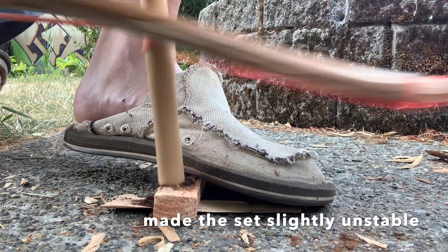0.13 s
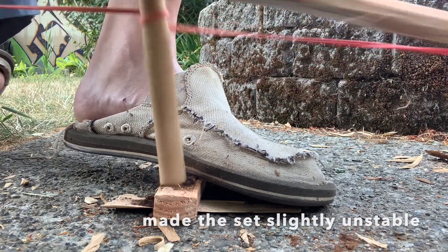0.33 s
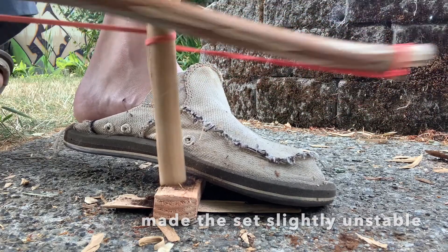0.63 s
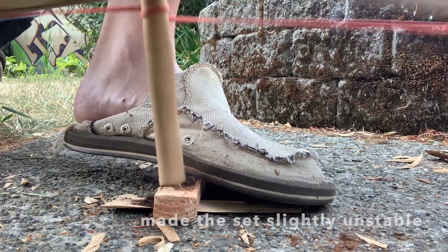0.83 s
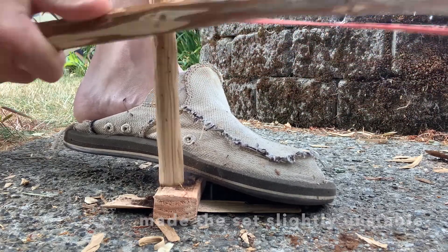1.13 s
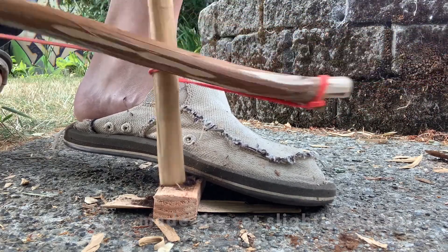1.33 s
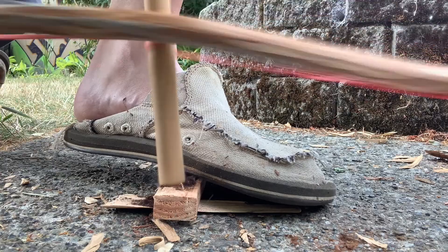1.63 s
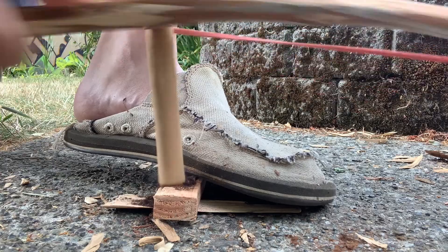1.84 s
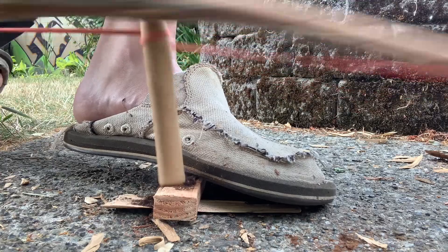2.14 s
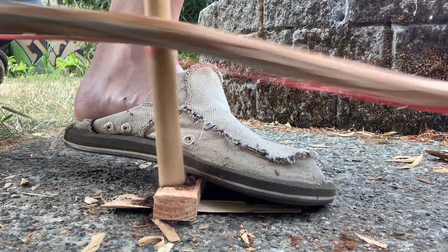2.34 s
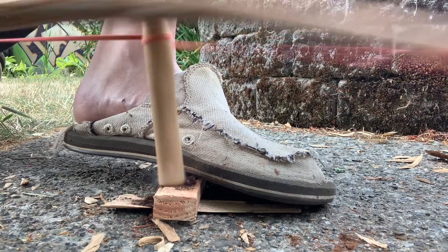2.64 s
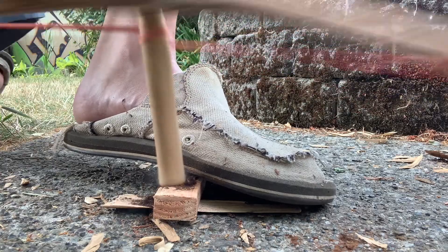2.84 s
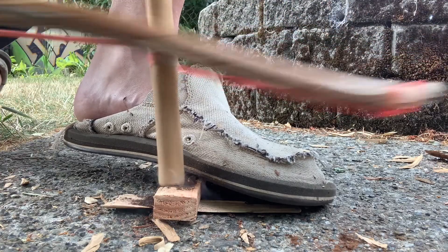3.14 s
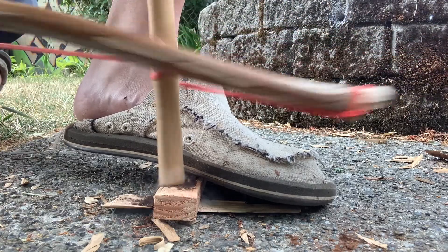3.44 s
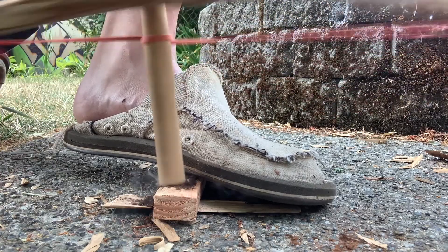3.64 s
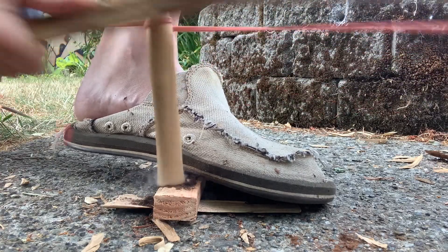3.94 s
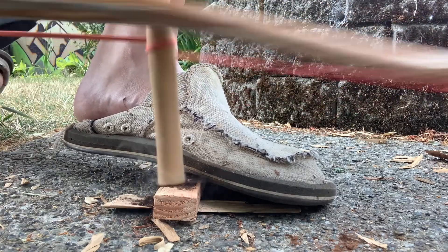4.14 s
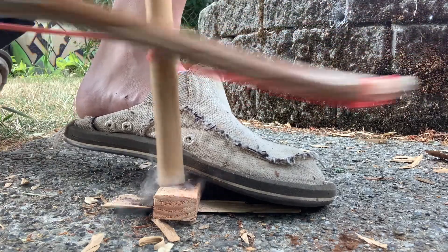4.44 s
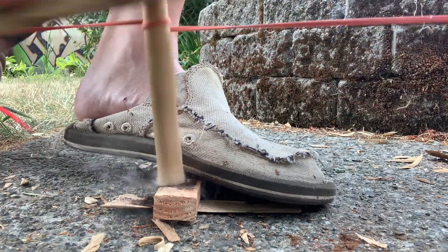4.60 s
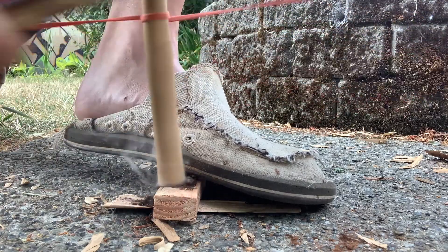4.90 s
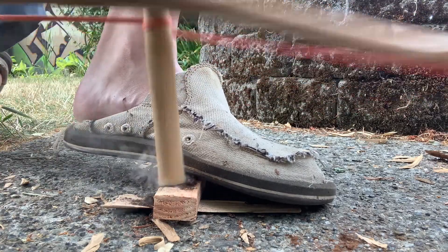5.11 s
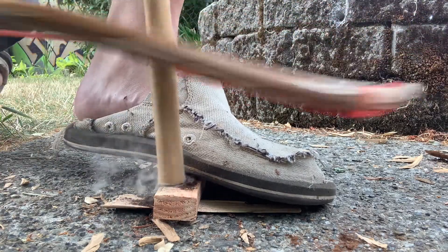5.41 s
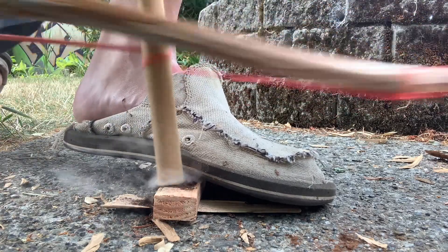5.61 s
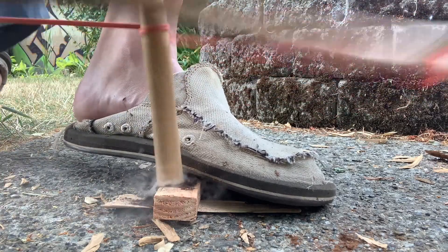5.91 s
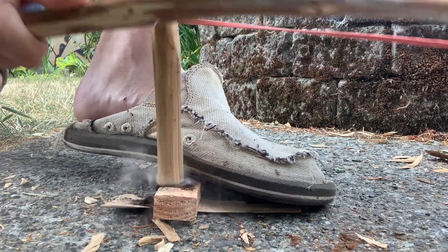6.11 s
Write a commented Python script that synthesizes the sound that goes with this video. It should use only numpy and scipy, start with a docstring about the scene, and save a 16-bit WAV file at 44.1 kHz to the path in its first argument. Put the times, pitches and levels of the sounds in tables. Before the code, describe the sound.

Close up and outdoors, a bow drill grinds wood against wood in a quick, steady rhythm. Dry rasping strokes alternate between slightly higher and lower squeaks, with irregular clicks from the spindle and cord and a soft rumble from the board on the ground. The squeaks weaken toward the end while the scraping carries on. A faint low hum dies away early, leaving a quiet wash of far traffic and leaves behind.

```python
"""Bow drill outdoors

A cord spins a wooden spindle to and fro in a board, close to a pair of microphones. Sliding friction
hisses with the spin; stick-slip friction in the socket excites the modes of spindle and board, which
chatter and ring up where the tip catches. Each stroke shakes the board on the ground. The spindle stops
at every turn; wood and cord tick as they slip. Behind lie a far murmur and a faint hum."""
import sys
import numpy as np
from scipy import signal
from scipy.fft import rfft, irfft, next_fast_len
from scipy.io import wavfile
from scipy.ndimage import uniform_filter1d

SR = 44100
rng = np.random.default_rng(int(sys.argv[2]) if len(sys.argv) > 2 else 0)


def bounce(signal):
    """Save signal as a 16-bit WAV file at the path given by the first command-line argument."""
    frames = np.transpose(np.atleast_2d(signal))
    limited = np.clip(frames, -1, 1)
    pcm = np.round(limited * 32767).astype(np.int16)
    wavfile.write(sys.argv[1], SR, pcm)


N = 276066
TIME = np.arange(N) / SR


def amp(db):
    """Amplitude ratio of a level in decibels."""
    return 10 ** (np.asarray(db) / 20)


def unit_rms(x):
    """Normalisation to rms 1."""
    return x / np.sqrt(np.mean(x ** 2) + 1e-20)


def shaped_noise(spectrum, coherence=1.0):
    """Spectral shaping: two channels of white noise of given coherence, filtered to (f/Hz, level/dB)."""
    own, right = rng.standard_normal(size=(2, N))
    left = coherence * own + np.sqrt(1 - coherence ** 2) * right
    hz, db = np.transpose(spectrum)
    size = next_fast_len(N)
    gain = amp(np.interp(np.log(np.fft.rfftfreq(size, 1 / SR) + 1), np.log(hz), db))
    return unit_rms(irfft(rfft([left, own], size) * gain, size)[:, :N])


def flutter(ms, depth_db):
    """Random modulation: a log-normal factor that wanders on a time scale of ms."""
    size = round(ms * SR / 1000)
    return amp(depth_db * unit_rms(uniform_filter1d(uniform_filter1d(rng.standard_normal(N), size), size)))


def mode(force, hz, width_hz, db, left_lead, left_db):
    """Forced resonance: a double pole, fixed or gliding, with its own phase and level at each side."""
    radius = np.exp(-np.pi * width_hz / np.sqrt(np.sqrt(2) - 1) / SR)
    if np.ndim(hz):
        carrier = np.exp(2j * np.pi * np.cumsum(hz) / SR)
        response = carrier * signal.lfilter([1], [1, -2 * radius, radius ** 2], force / carrier)
    else:
        pole = radius * np.exp(2j * np.pi * hz / SR)
        response = signal.lfilter([1], [1, -2 * pole, pole ** 2], force)
    response *= np.sqrt((1 - radius ** 2) ** 3 / (1 + radius ** 2))  # unit power gain
    sides = [[np.exp(1j * left_lead) * amp(left_db / 2)], [amp(-left_db / 2)]]
    return amp(db) * (response * sides).imag


def add(mix, s, sound):
    """Superposition of a sound on the mix at time s."""
    part = mix[..., max(round(s * SR), 0):][..., :sound.shape[-1]]
    part += sound[..., :part.shape[-1]]


# Spectrum of the outdoor background: f/Hz, level/dB
AIR_SPECTRUM = [(25, -26), (45, -39), (80, 1), (170, 7), (300, -16.5), (700, -12), (2000, -26),
                (16000, -32)]
def air():
    """Ambient noise: far traffic and leaves reach the two microphones partly coherent."""
    return amp(-44) * flutter(150, 1.3) * shaped_noise(AIR_SPECTRUM, coherence=0.6)


def hum():
    """Narrow-band noise: a faint, fuzzy low hum that slowly fades."""
    fade = amp(-1.5 * TIME)
    return fade * mode(rng.standard_normal(N), hz=168.8, width_hz=10, db=-39.5, left_lead=0, left_db=-3.6)


# The tip's bite in each stroke, push and pull in turn: start t/s, end t/s, level/dB
STROKES = [(-0.05, 0.049, -37), (0.111, 0.223, -25), (0.299, 0.414, -27.5), (0.512, 0.644, -28.5),
           (0.7, 0.788, -22), (0.857, 0.986, -25.5), (1.033, 1.13, -22), (1.209, 1.337, -24),
           (1.401, 1.532, -26), (1.601, 1.719, -23.5), (1.798, 1.879, -22.5), (1.961, 2.081, -29.5),
           (2.133, 2.234, -25.5), (2.301, 2.435, -23.5), (2.453, 2.585, -27), (2.646, 2.761, -23),
           (2.827, 2.926, -22.5), (2.984, 3.096, -25.5), (3.168, 3.244, -23), (3.339, 3.432, -24.5),
           (3.504, 3.588, -21.5), (3.658, 3.758, -26.5), (3.83, 3.916, -22.5), (3.989, 4.096, -27),
           (4.161, 4.244, -22), (4.328, 4.419, -25.5), (4.483, 4.569, -25.5), (4.631, 4.745, -25.5),
           (4.814, 4.898, -23), (4.965, 5.069, -30.5), (5.132, 5.207, -23), (5.281, 5.384, -26.5),
           (5.441, 5.518, -26.5), (5.573, 5.694, -25.5), (5.732, 5.827, -23.5), (5.877, 5.981, -33.5),
           (6.051, 6.113, -24.5), (6.189, 6.287, -30)]
FIRST_TURN_S, LAST_TURN_S = -0.077, 6.33
def bow_turns():
    """Reversal of motion: the time of the turn before each stroke, and the pause in biting around it."""
    start, end, _ = np.transpose(STROKES)
    pause = np.maximum(start[1:] - end[:-1], 0)
    turn_share = np.resize((0.41, 0.49), len(start))[1:]  # of the pause before a push, a pull
    return np.append(FIRST_TURN_S, end[:-1] + turn_share * pause), np.append(0, pause)


def bow_motion():
    """Reciprocating motion: the stroke under way at each sample and its progress from 0 to 1."""
    turn = np.append(bow_turns()[0], LAST_TURN_S)
    place = np.interp(TIME, turn, np.arange(len(turn)))
    return place.astype(int), place % 1


def drift(rule):
    """Linear drift as the socket wears and chars, a value per stroke; rows: at t = 0, change per s."""
    first, per_s = np.array(rule)[:, np.arange(len(STROKES)) % 2]
    return first + per_s * np.transpose(STROKES)[0]


def bite(stroke, progress):
    """Friction envelope: the tip grips sharply, swells and lets go; a little grip lasts all stroke."""
    start, end, db = np.transpose(STROKES)[:, stroke]
    edge = np.clip(np.minimum((TIME - start) / 0.0094 + 0.98, (end - TIME) / 0.0039 + 0.62), 0, 1)
    swell = 0.49 + 0.51 * np.sin(np.pi * np.clip((TIME - start) / (end - start), 0, 1))
    return amp(db) * edge ** 2 * swell + amp(-45) * np.sin(np.pi * progress) ** 2


# Spectrum of sliding wood: f/Hz, level/dB
HISS_SPECTRUM = [(300, -29), (1000, -5.5), (3000, 0.5), (5500, -3.5), (7200, -0.5), (11000, -9.5),
                 (13200, 0), (15500, -5)]
# Drift of the hiss: push level/dB, pull level/dB
HISS_DRIFT = [(-32, -31.5), (-0.04, -0.77)]
def hiss(stroke, progress):
    """Sliding friction: polished wood on wood gives noise that follows the spin and sinks at each turn."""
    turn, pause = bow_turns()
    still_s = np.resize((0.8, 0.32), len(pause)) * pause  # before a push, a pull
    start = turn + still_s / 2
    end = np.append(turn[1:] - still_s[1:] / 2, LAST_TURN_S)
    since, until = TIME - start[stroke], end[stroke] - TIME
    edge = np.clip(np.minimum(since / 0.046 + 0.46, until / 0.051 + 0.074), 0, 1)
    spin = edge * (0.57 + 0.22 * np.sin(np.pi * progress))
    floor_db = np.interp(TIME, turn, -40.5 - 140 * pause)  # the longer the pause, the quieter
    level = np.hypot(amp(drift(HISS_DRIFT)[stroke]) * spin, amp(floor_db))
    return amp([[-3.3], [-4.4]]) * level * flutter(14, 7.8) * shaped_noise(HISS_SPECTRUM)


# Spectrum of the board on the ground: f/Hz, level/dB
RUMBLE_SPECTRUM = [(25, -65), (45, -53), (80, 0), (130, 1), (170, 4.5), (230, 0), (400, -3), (700, -23)]
# Drift of the rumble: push level/dB, pull level/dB
RUMBLE_DRIFT = [(-30.5, -30.5), (-0.1246, 0.1)]
def rumble(stroke, progress):
    """Forced vibration: the spindle shakes the board, most early in a push and late in a pull."""
    tilt_db = np.where(stroke % 2, 11, -6.5) * (progress - 0.7538)
    level = amp(drift(RUMBLE_DRIFT)[stroke] + tilt_db) * np.sin(np.pi * progress) ** 1.35
    level = uniform_filter1d(level, size=300)
    return amp([[0.1], [2.7]]) * level * flutter(9.3, 3.2) * shaped_noise(RUMBLE_SPECTRUM)


# Modes of spindle and board: f/Hz, bandwidth/Hz, level/dB, left phase lead/rad, left over right/dB
WOOD_MODES = [(280, 82, -10.5, -0.3, -5.6), (454, 109, -8.5, -0.94, -4.1), (832, 295, -6.5, -0.6, 2),
              (1619, 402, -3.5, -0.2, 0.5), (1980, 250, -1.5, -0.97, -7), (2720, 954, -2.5, 0.07, -4),
              (3980, 1400, -11, 0.16, -3.5), (6960, 1200, -12.5, 0.6, -1.5)]
# Drift of the ring, the spindle's first bending mode: push f/Hz, pull f/Hz
RING_PITCH_DRIFT = [(1095, 972.5), (-9.5, -11.5)]
# Drift of the ring's drive, weakening as the socket chars: push level/dB, pull level/dB
RING_LEVEL_DRIFT = [(1.6, 1.33), (-0.45, -0.53)]
# Drift of the drive to the modes above the ring: push level/dB, pull level/dB
RASP_DRIFT = [(-1.54, -2.3), (0.65, -0.074)]
RING_LEAD_RAD = 0.27  # phase lead at the left microphone
def chatter(stroke, progress):
    """Stick-slip excitation: clumps of small, uneven slips ring the modes of spindle and board."""
    slips_per_s = 1300
    size = np.minimum(rng.exponential(size=N), 3.4) * rng.choice([-1., 1.], size=N)
    slips = size * (rng.random(N) < slips_per_s / SR) * flutter(2.8, 5.4)
    # the turning spindle shows each microphone a different mix
    grip = (1 + 0.87 * rng.standard_normal(size=(2, N))) * bite(stroke, progress)
    ring_hz = uniform_filter1d(drift(RING_PITCH_DRIFT)[stroke], size=800) * flutter(7, 0.38)
    ring_hz *= 0.99 + 0.057 * np.sin(np.pi * progress)  # rises with the spin
    grind = grinding()
    # heavy low modes take in only part of a hard slip; light high modes take it whole
    low_drive = grip * unit_rms(np.sign(slips) * abs(slips) ** 0.56)
    high_drive = (grip * unit_rms(slips) + grind) * amp(drift(RASP_DRIFT)[stroke])
    share = flutter(8.6, 3.98)
    wood = np.zeros((2, N))
    for k, (hz, *settings) in enumerate(WOOD_MODES):
        drive = high_drive if hz > ring_hz.mean() else low_drive
        own_share = np.roll(share, k * N // len(WOOD_MODES))  # a slip feeds the modes unevenly
        wood += mode(drive * own_share, hz, *settings)
    ring_drive = (low_drive + 0.51 * grind) * amp(drift(RING_LEVEL_DRIFT)[stroke]) * flutter(7.6, 2.63)
    ring = mode(ring_drive, ring_hz, width_hz=204, db=1.9, left_lead=RING_LEAD_RAD, left_db=-0.2)
    return amp(-1.46) * (ring + wood)


def burst(t, rise_s, fall_s):
    """Transient envelope: exponential rise and decay, peak 1."""
    shape = (1 - np.exp(-t / rise_s)) * np.exp(-t / fall_s)
    return shape / shape.max()


# Hard slips of wood and cord: t/s, crack level/dB, snap level/dB
TICKS = [(0.0367, -25, -14.5), (0.1967, -17.5, -14), (0.2408, -36, -19.5), (0.3062, -17, -54),
         (0.461, -26, -17), (0.5672, -24, -14), (0.592, -15.5, -20), (0.9496, -12, -17.5),
         (1.0367, -10.5, -32), (1.1642, -28.5, -58), (1.2548, -21, -30), (1.4269, -13.5, -45),
         (1.5626, -27.5, -16), (1.655, -14.5, -25), (1.6811, -19, -28), (1.71, -16.5, -24),
         (1.748, -25.5, -10.5), (1.7933, -12, -29), (1.8259, -9.5, -29), (1.929, -32, -44),
         (2.1015, -28, -24), (2.1599, -15, -30), (2.4235, -16.5, -18), (2.656, -21, -13.5),
         (2.7192, -16.5, -9.5), (2.75, -20.5, -19), (2.7814, -18, -17), (2.8747, -11.5, -22),
         (2.9083, -11, -21), (2.9521, -34, -29), (3.1248, -28, -22.5), (3.1808, -16, -43),
         (3.2321, -16, -52), (3.4122, -19, -56), (3.458, -19.5, -30), (3.869, -10.5, -16),
         (3.8878, -13.5, -8.5), (4.0868, -13, -25), (4.1387, -23.5, -58), (4.2221, -11.5, -7),
         (4.4981, -15, -23), (4.5228, -14, -6.5), (4.543, -14, -8), (4.83, -21, -34), (4.8548, -14, -29),
         (4.8803, -18, -36), (4.923, -42, -33), (5.1128, -22.5, -48), (5.145, -12.5, -25),
         (5.1856, -11.5, -31), (5.3254, -19, -36), (5.3561, -12.5, -44), (5.4656, -9, -30),
         (5.4963, -14, -46), (5.668, -19, -40), (5.7085, -28.5, -16.5), (5.7719, -10, -6.5),
         (5.793, -15, -10.5), (5.812, -19, -26), (6.0113, -28.5, -17), (6.0532, -17, -32)]
def ticks():
    """Impulsive excitation: a hard slip gives a crack of a few cycles and a shorter, bright snap."""
    out, t = np.zeros((2, N)), np.arange(SR // 100) / SR
    treble = signal.butter(2, 6500, "high", fs=SR, output="sos")
    for s, crack_db, snap_db in TICKS:
        wood_noise, snap_noise, left_noise = rng.standard_normal(size=(3, len(t)))
        hz = 3140 + 41 * (snap_db - crack_db)  # the more snap over crack, the higher the crack
        band = signal.butter(2, [0.46 * hz, 1.46 * hz], "band", fs=SR, output="sos")
        wood = unit_rms(signal.sosfilt(band, [1.14 * wood_noise + 0.4 * left_noise, wood_noise]))
        crack = amp(crack_db) * wood * amp([[-2.2], [2.1]]) * burst(t, 0.00058, 0.0021)
        snap = amp(snap_db) * unit_rms(signal.sosfilt(treble, snap_noise)) * burst(t, 0.00042, 0.0012)
        add(out, s - 0.0007, crack + snap)
    return out


# Catches of the tip in the socket: centre t/s, peak level/dB, duration/ms
CATCHES = [(0.1645, -12, 3.7), (0.1807, -14, 8.1), (0.1988, -11, 3.8), (0.3686, -7.5, 7.7),
           (0.5795, -1.5, 6.2), (0.6072, -9, 3.8), (0.7232, -9, 3.2), (0.736, -11, 11), (0.76, -8.5, 1.2),
           (0.899, -12.5, 7.8), (0.9521, -10, 3.1), (1.0771, -6, 1.1), (1.0956, -8.5, 3.7),
           (1.2573, -7, 4.9), (1.268, -7, 4.9), (1.317, -11.5, 4.1), (1.4547, -10, 3.2),
           (1.4787, -14.5, 8.5), (1.5045, -9, 4.5), (1.657, -7.5, 5.1), (1.6825, -14, 3.4),
           (1.7117, -12, 4.4), (1.8268, -8, 3), (1.8512, -7, 8.9), (2.0003, -13.5, 4.8), (2.195, -6.5, 5.1),
           (2.3871, -18, 6.1), (2.5229, -4.5, 4.5), (2.5454, -3, 8.6), (2.708, -8.5, 4.4), (2.8937, -11, 2),
           (2.9098, -13, 6.9), (3.0274, -6.5, 5.3), (3.052, -13, 7.3), (3.1871, -12, 3.0),
           (3.2066, -15, 2.9), (3.2289, -3, 4.8), (3.396, -18, 2.8), (3.5424, -6, 5.6), (3.5632, -10, 9.3),
           (3.7086, -14, 6.1), (3.8671, -4.5, 2.2), (3.9075, -12.5, 5.2), (4.203, -13, 6.0),
           (4.2116, -8, 2.9), (4.2264, -11.5, 3), (4.3691, -13, 5.2), (4.5197, -5.5, 2.7),
           (4.9909, -12.5, 2.5), (5.1848, -15, 5.0), (5.487, -12.5, 2.6), (5.6435, -15.5, 4.2),
           (5.9391, -16, 5.3), (6.0996, -18, 5.6), (6.2282, -8.5, 1.9)]
# Drift of the ring's overtone: push f/Hz, pull f/Hz
OVERTONE_PITCH_DRIFT = [(2010, 1863), (-20, 70)]
# Drift of the overtone relative to the ring: push level/dB, pull level/dB
OVERTONE_LEVEL_DRIFT = [(-7.5, -8.5), (0.9, -0.1)]
def catches(stroke):
    """Friction-driven resonance: the tip grabs, ring and overtone swell, and the socket damps them."""
    out, t = np.zeros((2, N)), np.arange(-SR // 100, SR // 100) / SR
    left = np.array([[1], [0]])
    for s, db, ms in CATCHES:
        phase, lead, delay, over_detune, over_lead, detune, over_level = rng.standard_normal(7)
        k = stroke[round(s * SR)]
        hz = drift(RING_PITCH_DRIFT)[k] * (1.019 + 0.025 * detune)  # a little sharp on average
        ring_phase = 2 * np.pi * (hz * t + phase) + (RING_LEAD_RAD + 0.63 * lead) * left
        ring = np.exp(-(t * 1000 / ms) ** 2 / 0.32) * np.sin(ring_phase)
        over_hz = drift(OVERTONE_PITCH_DRIFT)[k] * (1 + 0.054 * over_detune)
        over_db = drift(OVERTONE_LEVEL_DRIFT)[k] + 2.5 * over_level
        over_t = t - 0.001177 * delay
        over_phase = 2 * np.pi * over_hz * over_t + 0.54 * over_lead * left
        overtone = amp(over_db) * np.exp(-(over_t / 0.0019) ** 2) * np.sin(over_phase)
        add(out, s + t[0], amp(db) * (ring + overtone) * amp([[-1.2], [1.2]]))
    return out


def grinding():
    """Broadband excitation: friction noise swells around each catch, to drive the ring and high modes."""
    envelope, t = np.zeros(N), np.arange(-SR // 50, SR // 50) / SR
    for s, db, ms in CATCHES:
        add(envelope, s + t[0], amp(db - 13.5) * np.exp(-(t * 1000 / (1.5 * ms)) ** 2))
    return envelope * rng.standard_normal(N)


# Echo paths: left delay/ms, left level/dB, right delay/ms, right level/dB
ECHOES = [(1.3, -18.5, 1.856, -21.5), (3.1, -24, 4.3, -25.5), (7.2, -25.5, 5.4, -10.5),
          (11.5, -34, 10, -11.5)]
def reflections(direct):
    """Early reflection: ground, shoe and stone wall add delayed, weaker copies to the direct sound."""
    taps = np.zeros((2, SR // 20))
    taps[:, 0] = 1
    for left_ms, left_db, right_ms, right_db in ECHOES:
        taps[0, round(left_ms * SR / 1000)] += amp(left_db)
        taps[1, round(right_ms * SR / 1000)] += amp(right_db)
    return signal.oaconvolve(direct, taps, axes=1)[:, :N]


def scene():
    """Superposition of the drill, its echoes and the outdoor background."""
    stroke, progress = bow_motion()
    wood = reflections(chatter(stroke, progress) + catches(stroke) + ticks())
    return wood + hiss(stroke, progress) + rumble(stroke, progress) + air() + hum()


def record(dry):
    """Path difference and saturation: a spaced pair, a bass cut, soft overload and a band limit."""
    lag_samples, ceiling = 2, 1.27
    spaced = np.array([np.roll(dry[0], lag_samples), dry[1]])  # the left microphone is farther off
    thin = signal.sosfilt(signal.butter(5, 50, "high", fs=SR, output="sos"), spaced)
    rounded = ceiling * np.tanh(thin / ceiling)
    lowpass = signal.firwin(511, 16000, window=("kaiser", 9), fs=SR)
    return signal.oaconvolve(rounded, lowpass[None], "same")


dry = scene()
out = record(dry)
bounce(out)
```